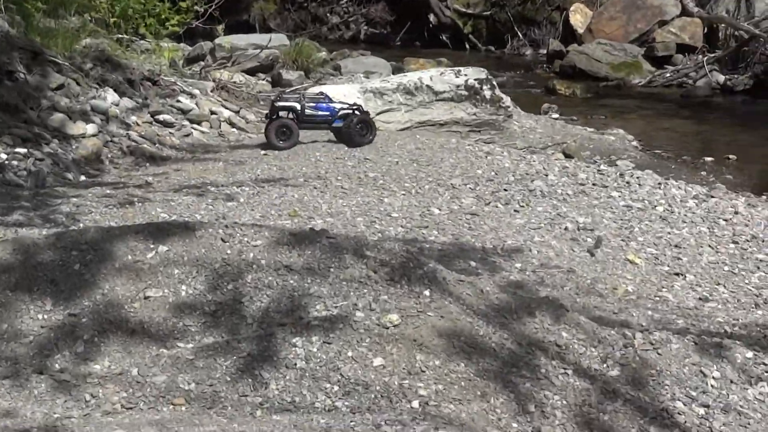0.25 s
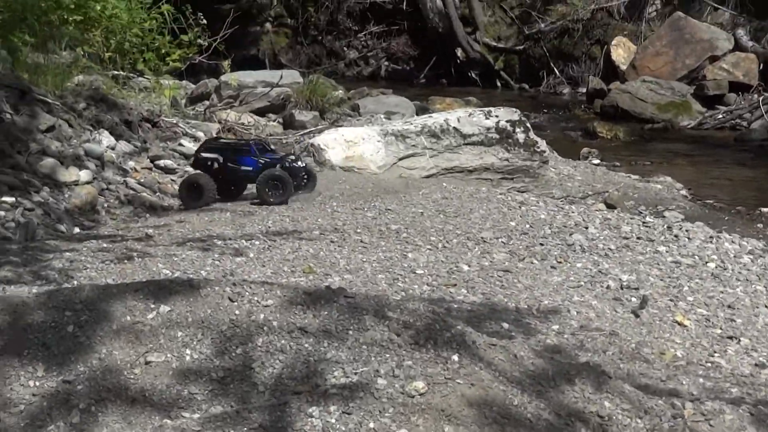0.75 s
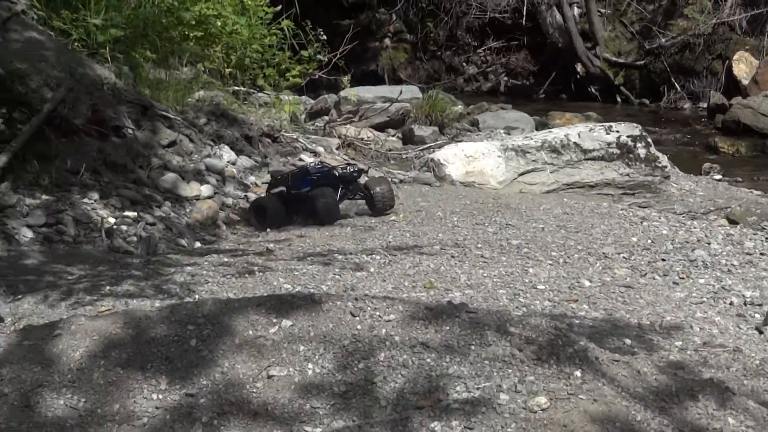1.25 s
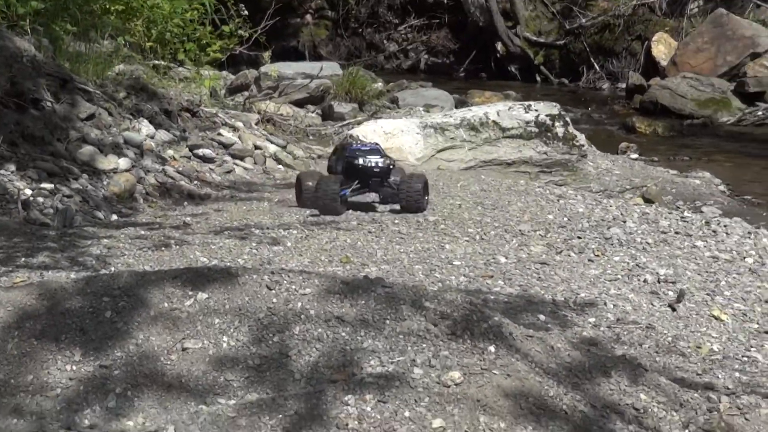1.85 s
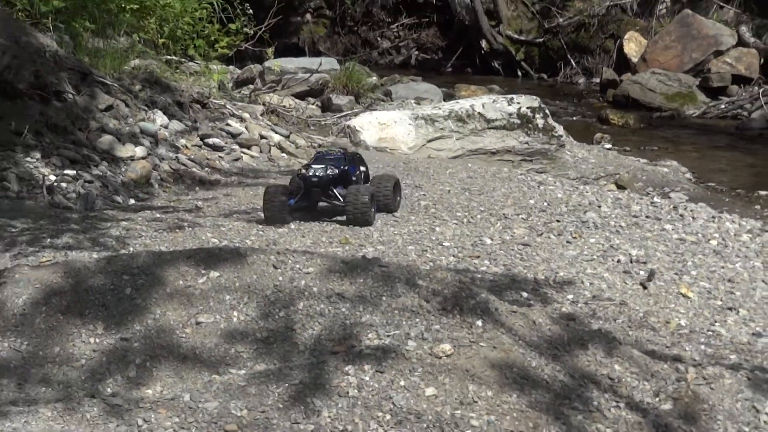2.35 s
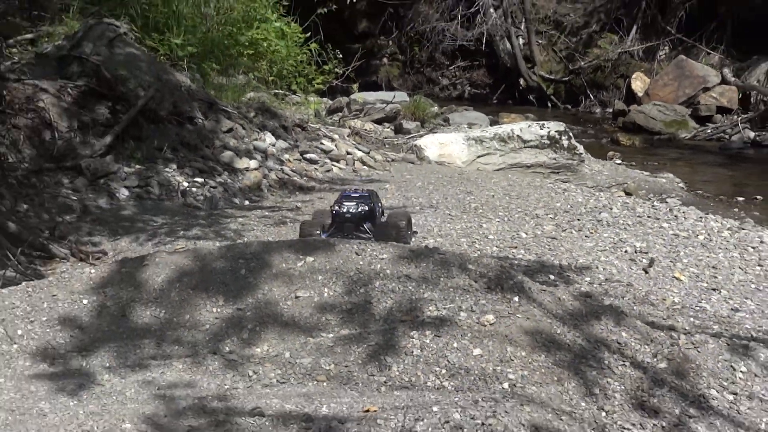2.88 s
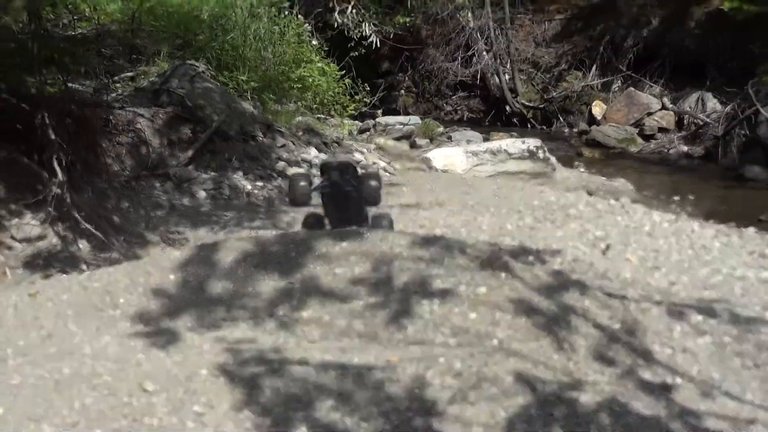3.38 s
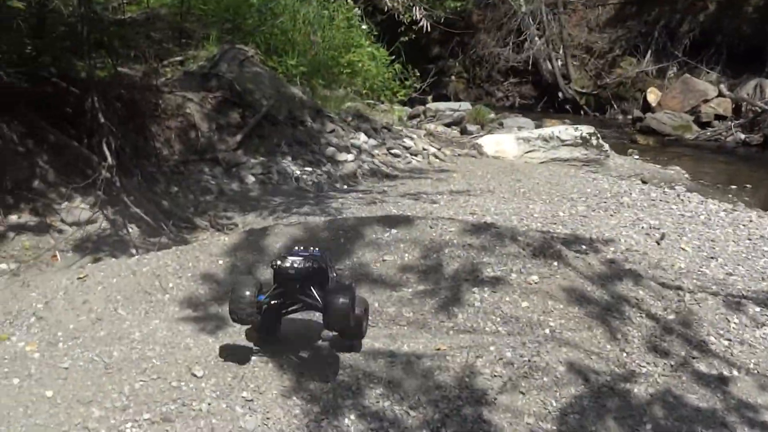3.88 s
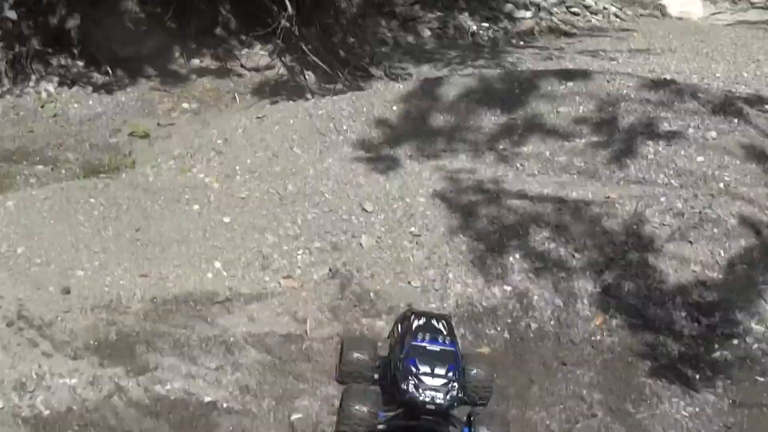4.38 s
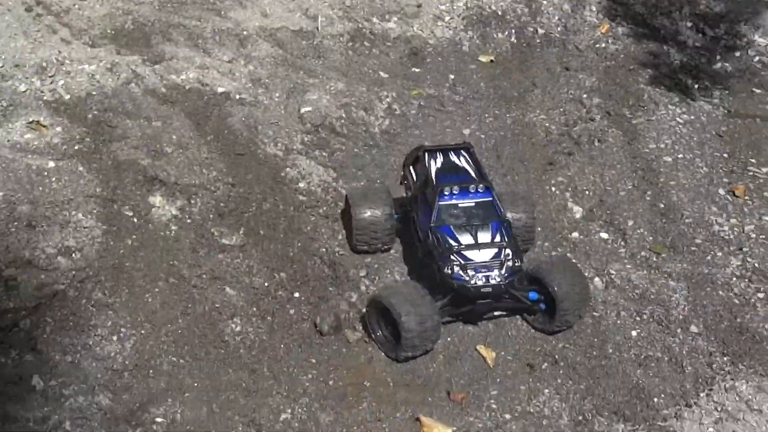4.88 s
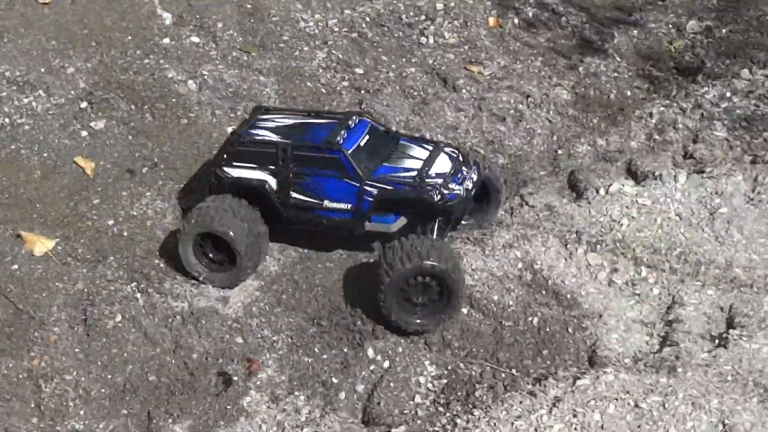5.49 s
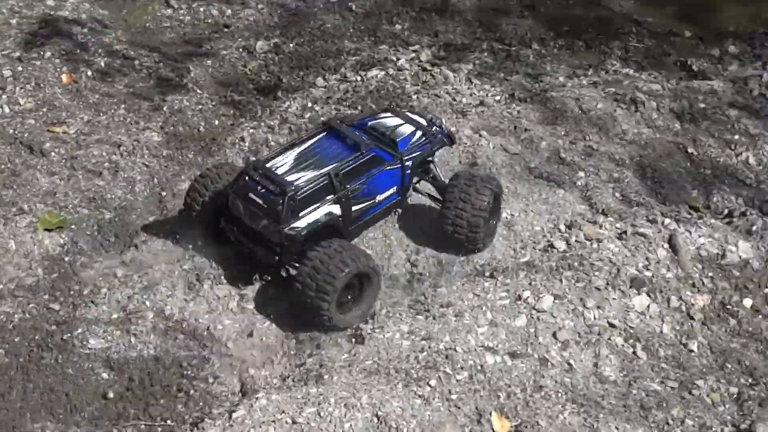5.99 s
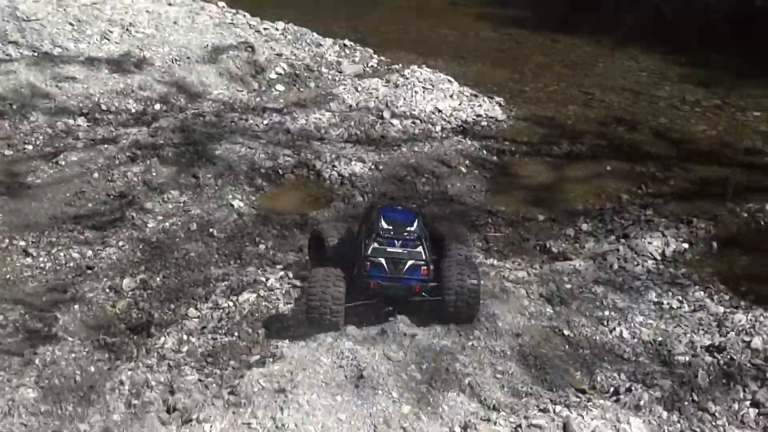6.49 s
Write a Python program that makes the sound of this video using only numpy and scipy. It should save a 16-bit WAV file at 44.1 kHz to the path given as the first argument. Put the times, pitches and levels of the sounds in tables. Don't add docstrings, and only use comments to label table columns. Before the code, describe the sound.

On an open gravel bank, shallow water murmurs softly and widely. A small electric truck starts quietly some way off; at 0.4-0.8 s it turns in a gritty spurt, with rattling gears and clicking stones. Small peeps and chips of birds come near 1 s, and a lighter crunch and rattle around 1.2-1.5 s. From 1.8 to 2.7 s tiny steely pings tick over moderate gear chatter, with falling bird whistles near 2.1 and 2.7 s. At 3.3 s the throttle bursts: bright fizz, rattle and a shell knock, and the low rumble drops out in the air. Landing at 4.0-4.2 s brings dull thuds and sharp plastic snaps, then smaller cracks to 4.4 s. Close stones clatter around 4.9-5.2 s. From 5.5 s a blurred whine climbs over loud grinding and a thin steady high tone, peaking near 6 s, then fading while rattle and crunch continue to the end.

```python
import sys
import numpy as np
from scipy import signal
from scipy.fft import rfft, irfft, next_fast_len
from scipy.io import wavfile
from scipy.ndimage import uniform_filter1d, map_coordinates

SR = 44100
rng = np.random.default_rng(int(sys.argv[2]) if len(sys.argv) > 2 else 0)


def transcribe(signal):
    frames = np.atleast_2d(signal).T
    limited = np.clip(frames, -1, 1)
    pcm = np.round(limited * 32767).astype(np.int16)
    wavfile.write(sys.argv[1], SR, pcm)


def natural_amplitude(level_db):
    exponent = np.asarray(level_db, float) / 20
    return 10 ** exponent


N = 297234


def unit(x):
    return x / np.sqrt(np.mean(np.abs(x) ** 2) + 1e-20)


def along(points, hz):
    f, v = np.transpose(points)
    return np.interp(np.log(hz + 1), np.log(f + 1), v)


def curves(rows):
    s, *cols = np.transpose(rows)
    return [np.interp(np.arange(N) / SR, s, c) for c in cols]


def per_sample(coarse):
    return np.interp(np.arange(N) / SR, np.arange(len(coarse)) / 1000, coarse)


def humps(times, lengths):
    t = np.arange(0, N / SR + .002, .001)
    return np.exp(-((t - times[:, None]) / np.maximum(lengths, .004)[:, None]) ** 2)


def wobble(rate):
    knots = 2 * np.tanh(rng.standard_normal(int(N * rate / SR) + 4) / 2)
    return per_sample(map_coordinates(knots, [np.arange(N * 1000 // SR + 2) * rate / 1000]))


def filtered(x, response):
    m = next_fast_len(N + 8192)
    return irfft(rfft(x, m) * response(np.fft.rfftfreq(m, 1 / SR)), m)[..., :N]


def patchy(x, depth_db, size):
    z = signal.stft(x, nperseg=512)[2]
    field = rng.standard_normal(z.shape[-2:])
    field = uniform_filter1d(field, size=size[0], axis=0)
    field = uniform_filter1d(field, size=size[1], axis=1)
    return signal.istft(z * natural_amplitude(depth_db * unit(field)), nperseg=512)[1][..., :N]


def grit(spread_db, share):
    size = (rng.random(N) < share) * natural_amplitude(spread_db * np.minimum(rng.exponential(size=N), 3.5))
    return unit(rng.standard_normal(N) * (1 + size))


def resonance(hz, width_hz):
    core = np.exp(-np.pi * width_hz / SR)
    skirt = np.exp(-np.pi * 6.5 * width_hz / SR)
    blows = rng.standard_normal((2, N))
    a, b = signal.lfilter([1], np.poly([core, skirt, skirt]), blows)
    phase = 2 * np.pi * np.cumsum(hz * np.ones(N)) / SR
    return unit(a * np.cos(phase) + b * np.sin(phase))


# pitch_hz, density_db (per Hz)
STREAM_COLOUR = [(18, -70), (30, -40), (109, -35), (486, -1), (1460, 0), (1810, -9.5), (3310, -9),
                 (4780, -9.5), (12600, -17), (16000, -27)]
# pitch_hz, likeness (0..1)
STREAM_LIKENESS = [(40, .6), (150, 0.24), (600, 0.78), (2000, 0.85), (8000, 0.94)]


def stream():
    pair = patchy(rng.standard_normal((2, N)), depth_db=2.0, size=(6, 8))

    def colour(hz):
        angle = np.arccos(np.clip(along(STREAM_LIKENESS, hz), -1, 1)) / 2
        return natural_amplitude(along(STREAM_COLOUR, hz)) * np.array([np.cos(angle), np.sin(angle)])

    mid, side = filtered(pair, colour)
    return natural_amplitude(-45.0) * unit(np.array([mid + side, mid - side]))


# start_s, length_s, first_hz, last_hz, level_db
BIRD_NOTES = [
    (.92, 0.099, 5880, 5750, -52),
    (1.032, 0.054, 3700, 3500, -49),
    (2.12, .07, 5700, 5050, -55),
    (2.69, 0.083, 6500, 4300, -42.5),
    (2.819, .07, 4640, 4850, -50),
]
GLIDE_BENDS = [1.1, 1.06, 0.59, 3, 0.7]


def birds():
    out = np.zeros(N)
    for (s, length, first_hz, last_hz, db), bend in zip(BIRD_NOTES, GLIDE_BENDS):
        u = np.arange(round(length * SR)) / (length * SR)
        hz = first_hz + (last_hz - first_hz) * u ** bend
        whistle = np.sin(np.pi * u) * np.sin(2 * np.pi * np.cumsum(hz) / SR)
        out[round(s * SR):][:len(u)] += natural_amplitude(db + 3.5) * whistle
    return out


# start_s, peak_db, length_s, pitch_hz
STONE_HITS = [(0.443, -16.5, 0.024, 4130), (0.48, -18, 0.022, 4140), (0.598, -14, 0.04, 4050),
              (0.66, -17, 0.045, 3990), (0.721, -14.5, 0.016, 9400), (1.126, -26, 0.04, 5140),
              (1.189, -19, 0.017, 3870), (1.2344, -20, 0.022, 4240), (1.332, -18, 0.022, 3540),
              (1.547, -20, 0.022, 8620), (1.8826, -21, 0.019, 3790), (3.338, -9, 0.022, 9870),
              (3.442, -11, 0.022, 8700), (3.596, -8, 0.021, 7710), (3.748, -11, 0.023, 7800),
              (3.879, -11.5, 0.023, 9380), (4.031, -7, 0.041, 3730), (4.091, -11.5, 0.023, 4170),
              (4.126, -9.5, 0.016, 3800), (4.176, -10, 0.027, 4150), (4.332, -15, 0.015, 4180),
              (4.497, -11.5, 0.025, 10080), (4.8594, -14, 0.022, 3515), (4.96, -7.5, 0.018, 3750),
              (5.047, -6, 0.023, 8900), (5.17, -11, 0.024, 7550), (5.226, -8.5, 0.021, 3540),
              (5.5714, -13, 0.025, 3580)]


def stones():
    out, t = np.zeros(N + 2205), np.arange(2205) / SR
    f = np.fft.rfftfreq(len(t), 1 / SR)
    for s, db, length, hz in STONE_HITS:
        u = t / max(length, .001)
        rough = rng.standard_normal(len(t)) * natural_amplitude(3.4 * rng.standard_normal(len(t)))
        burst = u * np.exp(-u - 4.54 * u ** 2) * rough
        wide = natural_amplitude(-6.5) * (1j * f / 1800) / (1 + 1j * f / 1800) / (1 + 1j * f / 14000)
        own_pitch = .3j * f * hz / (hz * hz - f * f + .3j * f * hz)
        out[round(s * SR):][:len(t)] += natural_amplitude(db + 4.5) * irfft(rfft(burst) * (wide + own_pitch), len(t))
    return out[:N]


# start_s, peak_db, pitch_hz, t60_s
SHELL_KNOCKS = [(0.216, -24.5, 1055, 0.041), (0.511, -24, 910, 0.08), (0.839, -31, 1108, 0.1),
                (0.899, -30, 1014, 0.06), (1.729, -34, 500, 0.072), (2.169, -28, 877, 0.054),
                (2.559, -33, 420, 0.14), (3.454, -12, 793, 0.053), (4.171, -27, 1098, 0.045),
                (6.479, -23, 901, 0.061)]
# start_s, peak_db, pitch_hz, t60_s
TYRE_THUDS = [
    (3.619, -57, 104.5, 0.11),
    (3.968, -36, 150, 0.087),
    (4.082, -31, 251, 0.14),
    (4.163, -30, 211, 0.094),
    (4.188, -24, 320, .08),
]
# start_s, peak_db, pitch_hz
GRIT_PINGS = [(1.7981, -23, 7880), (1.8823, -29, 7920), (1.9503, -22, 7900), (1.9977, -27, 7750),
              (2.1518, -26, 7380), (2.1997, -24, 7630), (2.2867, -30, 9460), (2.3688, -25, 8550),
              (2.4476, -27, 8770), (2.513, -22, 8610), (2.6212, -32, 7530), (2.74, -35, 7670),
              (1.754, -28, 9450), (1.811, -26, 8400), (1.895, -28, 9100), (1.968, -27, 9050),
              (2.018, -26, 8650), (2.165, -28, 8730), (2.215, -26, 8700), (2.27, -28, 7950),
              (2.392, -26, 7800), (2.43, -27, 8550), (2.498, -22, 8600), (2.495, -28, 7600),
              (2.58, -28, 9500), (2.6, -26, 8200), (2.668, -27, 7900), (2.683, -26, 7900)]


def knocks():
    out, t = np.zeros(N + 8820), np.arange(8820) / SR
    pings = [(*ping, 0.028) for ping in GRIT_PINGS]
    for s, db, hz, t60 in SHELL_KNOCKS + TYRE_THUDS + pings:
        overtone = np.sin(2 * np.pi * 1.6 * hz * t + rng.uniform(0, 8.6))
        ring = np.sin(2 * np.pi * hz * t) + 0.45 * overtone
        onset = 1 - np.exp(-t / 0.0011)
        out[round(s * SR):][:len(t)] += natural_amplitude(db - 6.5 - 60 * t / max(t60, .01)) * onset * ring
    return out[:N]


# start_s, peak_db, pitch_hz
SHELL_CRACKS = [(3.985, -16, 4200), (4.047, -10, 3700), (4.097, -5, 4100), (4.127, -9, 3800),
                (4.182, -8, 4500), (4.334, -14, 4300), (4.4, -15, 3000)]


def cracks():
    out, t = np.zeros(N + 2000), np.arange(2000) / SR
    t60_s, spread = 0.016, .35
    offsets = np.array([[0], [-.3], [.4], [-1.4], [1.6], [-3], [2.4]])
    mode_db = [[0], [-3], [-4], [-7], [-7], [-8], [-9]]
    for s, db, hz in SHELL_CRACKS:
        modes_hz = hz * np.exp(spread * offsets)
        spray = (np.sin(2 * np.pi * modes_hz * t) * natural_amplitude(mode_db)).sum(axis=0)
        snap = spray + .8 * rng.standard_normal(len(t))
        out[round(s * SR):][:len(t)] += natural_amplitude(db - 12 - 60 * t / t60_s) * snap
    return filtered(out[:N], lambda f: (1j * f / (1j * f + 1200)) ** 3)


# start_s, spin_db, grip_db
WHEEL_MOTION = [(0.0, -38, -15), (0.14, -48.5, -8), (0.41, -48, -3.5), (0.63, -30.5, -13.5),
                (0.88, -43.5, -9), (1.1, -44, -9), (1.28, -37.5, -9.5), (1.52, -37.5, -12.5),
                (1.63, -43, -10.5), (2.5, -38.5, -13), (3.25, -43.5, -7), (3.33, -23.5, -17),
                (3.52, -29, -14), (3.95, -27, -16), (4.05, -30, -8.5), (4.4, -34.5, -9.5),
                (5.85, -27.5, -7), (6.74, -32.5, -9)]
# start_s, length_s, grit_db (thrown), weight_db (on the tyres)
GROUND_JOLTS = [(0.444, .015, 13, 3), (0.587, 0.048, -1, 2.5), (0.72, .03, 0.5, -4), (1.134, 0.03, 1, 4),
                (1.274, 0.036, 3, 3.5), (1.754, 0.032, -3.5, -1), (3.388, 0.038, 3, 1.5),
                (3.455, 0.027, 3.5, 9.5), (3.61, 0.021, 4.5, 6), (3.77, 0.037, 4, 3.5),
                (3.981, 0.02, 2.5, 8), (4.075, 0.011, -10, -0.5), (4.172, 0.047, 4.5, 6),
                (4.316, 0.039, 2, 4), (4.51, 0.024, 3, 4.5), (4.867, 0.031, 7, 5.5), (5.026, .015, -3, 3.5),
                (5.06, 0.023, 8, -4.5), (5.105, 0.028, 1, 3.5), (5.182, 0.053, 1.5, 1.5),
                (5.5, 0.18, -4.5, -1), (5.593, 0.036, 3.5, 0.5), (5.718, 0.035, -3, -2.5),
                (5.85, 0.053, -0.5, 2.5), (6.377, 0.049, 1, -1.5), (6.488, .025, -1, 4.5),
                (6.577, 0.031, -0.5, -1)]


def wheels():
    spin_db, grip_db = curves(WHEEL_MOTION)
    s, length, grit_db, weight_db = np.transpose(GROUND_JOLTS)
    swell = humps(s, length)
    thrown_db = per_sample(grit_db @ swell)
    pressed_db = per_sample(weight_db @ swell)
    flight_s, flight_length_s = 3.76, 0.19
    aloft = np.exp(-((np.arange(N) / SR - flight_s) / flight_length_s) ** 6)
    rumble_db = -11.5 + 1.087 * spin_db + 1.18 * grip_db + 1.23 * pressed_db - 15.5 * aloft
    return spin_db + grip_db + pressed_db, spin_db + thrown_db, rumble_db, thrown_db


# pitch_hz, width_hz, level_db
MOTOR_STEEL = [(6800, 400, -6), (7600, 400, -2), (8600, 350, -4), (9500, 350, -2), (10400, 400, -6),
               (11500, 400, -4), (12450, 350, -3), (13350, 350, -7), (14200, 400, -6), (15300, 400, -7)]


def pebbles(count):
    when, mode, detune, life, size = rng.random((count, 5)).T[:, :, None]
    t = np.arange(400) / SR
    hz = np.array(MOTOR_STEEL)[(mode * len(MOTOR_STEEL)).astype(int), 0] * (1 + 0.064 * (detune - .5))
    decay = natural_amplitude(-60 * t / (0.0078 + 0.012 * life))
    ring = np.sin(2 * np.pi * hz * t) * decay * (1 - np.exp(-t / 0.001))
    ring = ring * natural_amplitude(-3 * np.log(size + .05))
    at = (when * N).astype(int) + np.arange(len(t))
    return unit(np.bincount(at.ravel(), ring.ravel(), N + len(t))[:N])


# pitch_hz, density_db (per Hz)
CRUNCH_COLOUR = [(120, -70), (260, -29), (380, -4.5), (480, 0.5), (700, -6.5), (1000, -0.5), (1950, -2),
                 (2700, -2), (4000, -6), (5000, -8.5), (16000, -15.5)]
# pitch_hz, density_db (per Hz)
FIZZ_COLOUR = [(1000, -61), (4000, 0), (5500, -4.5), (7600, 0), (9500, 0.5), (12500, -1.5), (15500, -3),
               (16500, -40.5)]
# pitch_hz, density_db (per Hz)
RUMBLE_COLOUR = [(30, -50), (70, -33), (120, -13.5), (200, -7), (300, -0.5), (420, -3.5), (800, -51)]


def tyres():
    crunch_db, fizz_db, rumble_db, _ = wheels()
    bumps = wobble(30)
    crunch = patchy(grit(spread_db=5, share=.01), depth_db=2.0, size=(3, 5))
    crunch = unit(filtered(crunch, lambda f: natural_amplitude(along(CRUNCH_COLOUR, f))))
    rumble = unit(filtered(rng.standard_normal(N), lambda f: natural_amplitude(along(RUMBLE_COLOUR, f))))

    def steel(f):
        return 1 + sum(natural_amplitude(db) / (1 + (2 * (f - hz) / width_hz) ** 2) for hz, width_hz, db in MOTOR_STEEL)

    clinks = grit(spread_db=3.0, share=0.028) + natural_amplitude(-9) * pebbles(count=4000)
    streaks = patchy(clinks, depth_db=2.2, size=(3, 60))
    fizz = unit(filtered(streaks, lambda f: natural_amplitude(along(FIZZ_COLOUR, f)) * steel(f)))
    lumps = natural_amplitude(1.4 * bumps + 1.2 * wobble(70))
    ground = natural_amplitude(crunch_db + 5.5 + 0.46 * bumps + 1.75 * wobble(25)) * crunch
    weight = natural_amplitude(rumble_db + 5.0 + 2.9 * wobble(13)) * rumble
    return ground + weight + natural_amplitude(fizz_db - 1.0) * lumps * fizz


# start_s, pitch_hz, level_db
MESH_WHINE = [(5.53, 1420, -38), (5.61, 1650, -31), (5.7, 1556, -31.5), (5.79, 1807, -26),
              (5.86, 1934, -26), (5.9, 1790, -25.5), (5.96, 2287, -23.5), (6.12, 2295, -25.5),
              (6.3, 2504, -33.5)]
# start_s, length_s, level_db
CONTROLLER_TONE = [(0.548, 0.14, -45), (1.2, 0.32, -53), (1.799, 1.05, -56.5), (2.8, 2.3, -62),
                   (4.898, 1.19, -47.5), (6.1, 0.74, -47)]


def whine():
    mesh_hz, mesh_db = curves(MESH_WHINE)
    t = np.arange(N) / SR
    on = uniform_filter1d(1. * (t > MESH_WHINE[0][0]), size=999)
    on = on * natural_amplitude(-26 * np.maximum(t - MESH_WHINE[-1][0], 0))
    mesh_hz = mesh_hz * (1 + .03 * wobble(40))
    octave_db, box_hz, box_width_hz = 9, 3305, 480
    octave = natural_amplitude(octave_db) * np.exp(-((2 * mesh_hz - box_hz) / box_width_hz) ** 2)
    octave = octave * natural_amplitude(1.7 * wobble(30)) * resonance(2 * mesh_hz, width_hz=120)
    mesh = on * natural_amplitude(mesh_db + 2.8 * wobble(30)) * (resonance(mesh_hz, width_hz=120) + octave)
    held = sum(natural_amplitude(db) * ((t > s) & (t < s + length)) for s, length, db in CONTROLLER_TONE)
    held = uniform_filter1d(held, size=1800)
    tone_hz = 5925 * (1 + 0.0044 * wobble(3))
    return mesh + held * natural_amplitude(1.5 * wobble(25)) * resonance(tone_hz, width_hz=15)


# start_s, load_db, effort (throttle -1..1), tub_hz
GEAR_TRAIN = [(0.0, -58, 0.61, 1300), (0.41, -55, -.6, 1420), (0.46, -42, -0.2, 1391),
              (0.7, -40.5, 0.18, 1309), (0.8, -50.5, 0.41, 1339), (1.08, -57, -0.042, 1350),
              (1.18, -43, 0.16, 1452), (1.54, -42.5, 0.89, 1434), (1.61, -51.5, -0.099, 1405),
              (1.86, -43, -0.27, 1391), (3.25, -43, -0.36, 1494), (3.33, -31, 0.41, 1400),
              (3.52, -34, -0.86, 1349), (4.5, -37, -0.8, 1327), (5.1, -30, -0.34, 1312),
              (5.52, -29.5, -0.31, 1328), (5.7, -28.5, .6, 1380), (6.74, -32.5, 0.018, 1380)]
# pitch_hz, width_hz, level_db (over load), effort_db (per unit), follows (power of tub pitch)
CHASSIS_PARTS = [(1380, 240, 0, -4, 1.01), (2050, 240, -16, 1, .01), (2448, 270, -5, -1.5, 0.0095),
                 (3139, 300, -1, -1.5, 0.4), (3586, 300, -3, 5.5, 0.01013), (4050, 300, -9, 0.5, 0.0098)]
# start_s, level_db, length_s, pitch_hz
GEAR_BITES = [(0.51, 9, .09, 4050), (0.61, 9, .02, 4050), (.675, 15.5, 0.02488, 4050),
              (.645, 14, 0.0499, 2080), (.54, 8, .04, 3100), (.65, 2.5, .05, 3400), (1.37, 9, 0.3, 2380),
              (1.36, 4.5, 0.02498, 3520), (1.28, 5, 0.03976, 3150), (1.33, 10, .12, 4050),
              (2.004, 6.5, .12, 3030), (1.46, 6, .04, 2350), (2.8, 7, .15, 3300), (2.7, 5, .4, 2480),
              (3.97, 5, .03, 3050), (4.19, 5, .04, 1520), (2.32, 2.5, .3, 1360), (3.3, 10, 0.03, 3000),
              (3.36, 13, .045, 2480), (3.411, 10, 0.04975, 3130), (3.855, 4.5, 0.19, 1380),
              (3.92, 8, .12, 2450), (3.605, 11.5, 0.021, 2450), (3.61, 4.5, .02, 3100), (3.85, 9, .2, 2050),
              (4.05, 7, 0.0201, 1300), (3.77, 6, .06, 3150), (4.505, 11.5, 0.024, 2200),
              (4.505, 7, 0.0353, 3080), (4.6, 11, 0.04524, 1260), (4.865, 11, 0.01986, 2990),
              (4.92, 9, 0.0201, 3080), (4.975, 16, 0.0176, 1250), (5.018, 8, 0.0139, 1280),
              (4.97, 5, .03, 3700), (4.852, -14, 0.095, 2450), (5.125, 8, 0.0393, 1340),
              (5.23, 3, 0.039, 1390), (5.185, 6, .025, 3030), (5.22, 3.5, .035, 3480),
              (5.385, 3, 0.0147, 1460), (5.36, 7.5, .07, 3620), (5.79, 6, .05, 3620),
              (5.141, 5.5, .15, 4050), (6.05, 6, .22, 3720), (5.897, -6, 0.099, 1350),
              (5.62, 5.5, 0.054, 3650), (6.6, 5, 0.0595, 3030), (6.38, 5, .08, 2980), (5.66, 6, .04, 3200),
              (6.37, 7.5, 0.0707, 1300)]
# start_s, length_s, blur (share of pitch)
CHASSIS_TWISTS = [
    (0.6, .2, .06),
    (1.35, .25, .03),
    (3.85, .4, .045),
    (5.3, .3, .02),
    (6.1, .3, .04),
]


def drive():
    load_db, effort, tub_hz = curves(GEAR_TRAIN)
    s, bite_db, length, bite_hz = np.transpose(GEAR_BITES)
    swell = humps(s, length)
    crunch_db, _, _, thrown_db = wheels()
    chatter = wobble(28)
    when, lasting, share = np.transpose(CHASSIS_TWISTS)
    steady = .01
    stray = steady + per_sample(share @ humps(when, lasting))

    def shaken(hz, width_hz, db, effort_db, follows):
        apart = np.log(bite_hz / hz)
        reached = np.exp(-(apart / 0.1) ** 2)
        bitten_db = per_sample((bite_db * reached) @ swell)
        pull = np.exp(1.2 * per_sample((apart * reached) @ swell))
        hz = hz * pull * (tub_hz / CHASSIS_PARTS[0][0]) ** follows * (1 + .006 * wobble(6))
        strand = resonance(hz * (1 + (steady + .2 * stray) * wobble(45)), width_hz / 4)
        rattle = resonance(hz * (1 + stray * wobble(220)), width_hz)
        level_db = load_db + db + effort_db * effort + bitten_db + 0.3 * thrown_db
        strand = 0.68 * natural_amplitude(0.22 * bitten_db - 70 * stray) * strand
        rattle = 0.75 * natural_amplitude(-0.15 * bitten_db) * rattle
        return natural_amplitude(level_db + 1.27 * chatter + 2.0 * wobble(45)) * (strand + rattle)

    cover = natural_amplitude(1.17 * crunch_db + 7 + chatter) * resonance(1930, width_hz=540)
    parts = sum(shaken(*part) for part in CHASSIS_PARTS)
    return filtered(cover + parts, lambda f: 1 / (1 + (1050 / (f + 1)) ** 6))


# pitch_hz, level_db
SIDE_SCATTER = [(40, -10), (150, -25), (500, -18), (1500, -27), (3500, -23.5), (6000, -21), (10000, -23),
                (15000, -29)]


def scene():
    truck = tyres() + stones() + drive() + whine() + knocks() + cracks()
    t = np.arange(4410) / SR
    rocks = rng.standard_normal(len(t)) * natural_amplitude(-60 * t / 0.058)
    scatter = signal.fftconvolve(truck, rocks / np.linalg.norm(rocks))[:N]
    side = filtered(scatter, lambda f: natural_amplitude(along(SIDE_SCATTER, f)))
    loud = np.sqrt(np.abs(uniform_filter1d(truck ** 2, size=15000)))
    water = stream() / (1 + loud / natural_amplitude(-15.0))
    return truck * natural_amplitude([[-.1], [.1]]) + np.array([side, -side]) + birds() + water


def band_limit(x):
    return signal.sosfilt(signal.butter(12, 16990, fs=SR, output="sos"), x)


def record(dry):
    mix = filtered(dry, lambda f: (1j * f / 60) / (1 + 1j * f / 60) * (f < 15900))
    return band_limit(mix)


dry = scene()
out = record(dry)
transcribe(out)
```